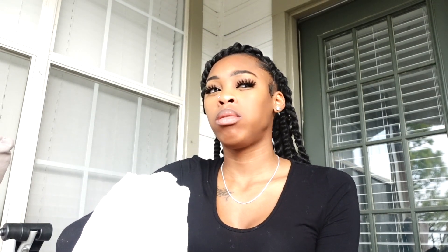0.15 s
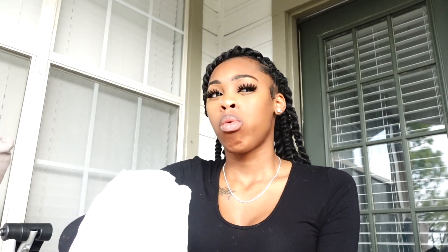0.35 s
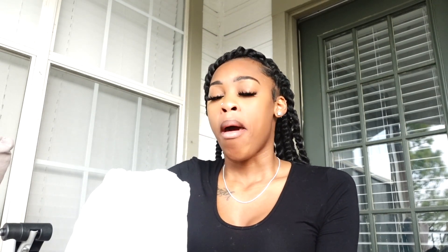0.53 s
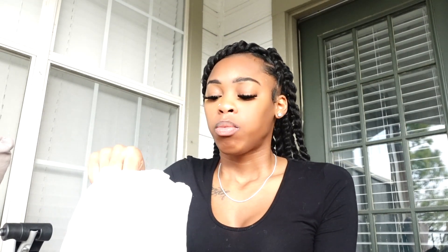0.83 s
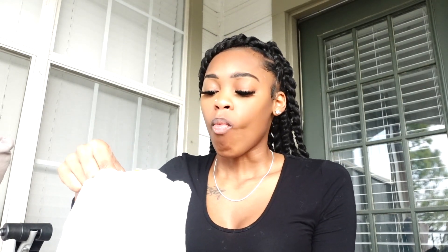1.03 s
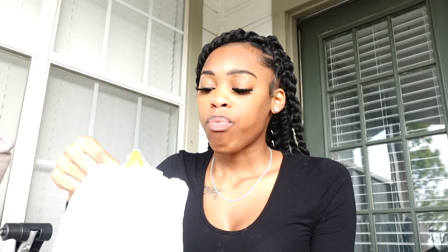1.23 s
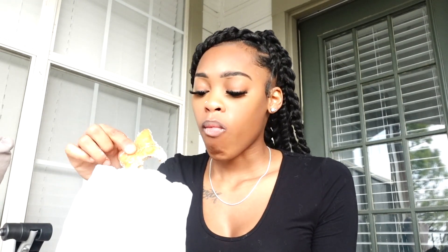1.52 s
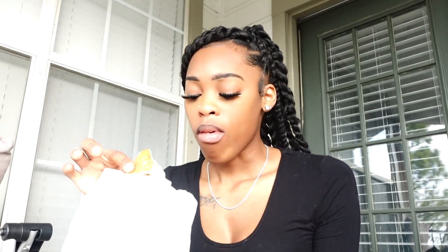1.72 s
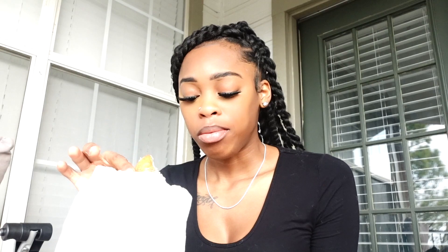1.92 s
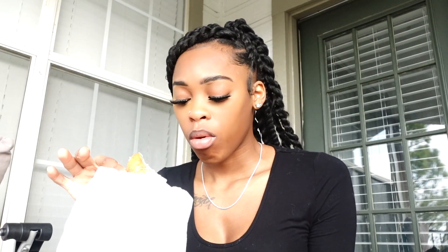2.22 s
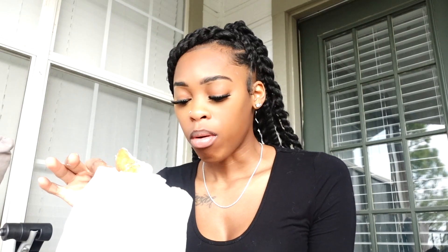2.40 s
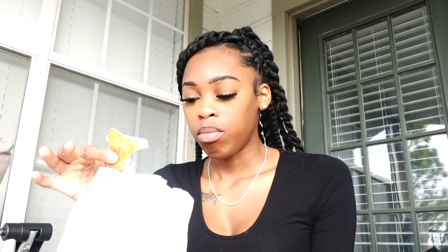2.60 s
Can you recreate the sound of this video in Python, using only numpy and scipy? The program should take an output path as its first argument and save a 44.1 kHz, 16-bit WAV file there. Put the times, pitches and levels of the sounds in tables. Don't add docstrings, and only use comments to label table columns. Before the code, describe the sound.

A stiff paper bag crinkles close to a phone microphone: a busy burst of snaps, ticks and brief finger squeaks, then sparser crackles and a few loud pops, on a covered porch with faint distant town hush.

```python
import sys
import numpy as np
from scipy import signal
from scipy.fft import rfft, irfft
from scipy.io import wavfile
from scipy.ndimage import uniform_filter1d

SR = 44100
rng = np.random.default_rng(int(sys.argv[2]) if len(sys.argv) > 2 else 0)


def undo_db(level):
    steps = np.asarray(level, float) / 20
    return 10 ** steps


def file_out(sig):
    cols = np.atleast_2d(sig).T
    lim = np.clip(cols, -1, 1)
    pcm = np.round(lim * 32767).astype(np.int16)
    wavfile.write(sys.argv[1], SR, pcm)


N = 121275

# start_s, body_peak_db, panel_ring_hz, snap_level_db, crack_level_db (both relative to body)
CREASE_SNAPS = [(.071, -33, 1270, -3, -33), (.199, -26.5, 1086, 0, -2.5), (.216, -34.5, 1240, -2, -2),
                (0.4127, -27, 1490, 1, -1.5), (0.432, -45, 1240, 7, 0), (0.49, -31.5, 1150, -1, -17),
                (0.519, -33, 1410, -8, 1), (.549, -26.5, 1390, -19, -8), (0.7257, -29, 1098, 3.5, 5),
                (0.9754, -32.5, 1120, -9.5, -18), (.9915, -29.5, 944, -28, -33),
                (1.348, -34, 860, -2.5, -9), (1.678, -41, 1040, 5, -30), (1.6907, -32, 1070, -20, -33),
                (1.6955, -19.5, 1064, 0, -0.5), (1.719, -34, 1540, -3, -6), (1.866, -31.5, 1165, -5, -24),
                (1.957, -33, 1330, -10, -32), (1.995, -31, 1270, 0, -1.5), (2.253, -23.5, 1087, -6.5, -11),
                (2.276, -24, 833, -12, 1), (2.308, -32, 1330, -19, -26), (2.371, -17, 1280, -11, 5.5),
                (2.509, -39.5, 1370, -27, -32), (2.278, -23, 1660, -16, -23), (0.546, -41, 1480, 4.5, -5),
                (.552, -31, 1250, -5, -12), (0.491, -40, 1340, -10, -20), (2.373, -25, 2170, 9, -6),
                (.204, -48, 1140, -4, -8)]
# start_s,
# peak_db, centre_hz
FOLD_TICKS = [(1.707, -26, 4500), (0.263, -46, 9000), (.3795, -37, 10500), (0.388, -37, 10000),
              (0.455, -28, 10300), (0.532, -25, 3100), (.588, -42, 14000), (1.249, -43.5, 8100),
              (1.261, -38, 4280), (1.351, -29.5, 4570), (1.788, -40, 11000), (1.793, -43, 9700),
              (1.810, -46, 12000), (1.822, -48, 12000), (1.829, -38, 7500), (1.845, -46, 5100),
              (1.848, -45, 11000), (1.857, -38, 10200), (1.872, -31.5, 5230), (1.887, -37, 5100),
              (1.894, -34.5, 9450), (1.906, -42, 7000), (1.944, -39, 12200), (2.245, -42, 8100),
              (2.2629, -26, 7100), (2.360, -44, 3800), (2.3702, -15.5, 8150), (2.464, -40, 11100),
              (2.277, -47, 4400), (2.729, -44, 1500), (.3765, -46, 10500), (.3855, -40, 11500),
              (0.397, -44, 9800), (0.408, -40, 2800), (.433, -28, 4500), (0.444, -30, 3460),
              (.5195, -19, 3060), (.530, -36, 3020), (.588, -35, 3020), (.644, -33, 2570),
              (0.712, -44, 9200), (.726, -21.5, 6660), (1.787, -39, 4170), (1.793, -43, 4300),
              (1.810, -46, 5500), (1.822, -51, 6500), (1.831, -37.5, 4000), (1.832, -45, 10000),
              (1.848, -39, 5500), (1.853, -46, 11000), (1.8575, -37, 6270), (1.876, -38, 11000),
              (1.883, -44, 9000), (1.917, -48, 4600), (2.007, -35, 3200), (2.008, -34, 2630),
              (2.263, -29.5, 5000), (2.364, -44, 10000), (2.48, -43, 3700), (2.286, -42, 4500)]
# start_s, length_s, level_db, pitch_hz, pitch_rise_share_per_s
FINGER_SQUEAKS = [(0.029, 0.025, -40, 4506, 0), (0.3065, 0.018, -34, 2505, 3), (0.347, 0.01, -43, 2490, 6),
                  (0.385, 0.0049, -29, 2440, 20), (0.394, 0.001, -24, 3140, 3),
                  (0.399, 0.001, -26, 3250, 5), (0.4538, 0.00087, -19, 3220, 0),
                  (0.615, 0.021, -41.5, 4640, -2), (0.383, 0.0075, -41, 1970, 15),
                  (.326, .005, -47, 2500, 0), (0.333, 0.015, -45, 4550, 0.5)]
# start_s, level_db, brightness_db_per_octave
HAND_SLIDE = [(0, -52.5, 2.5), (.125, -50, 0), (0.147, -57.5, 0.5), (0.199, -44, 0), (.27, -61.5, -1),
              (0.401, -49, 2), (0.638, -49, 0.5), (.7, -56, 0.5), (.97, -71.5, 1), (1.11, -56.5, 0.5),
              (1.18, -78.5, 7.5), (1.27, -57, 0), (1.4, -90, 8), (1.76, -71, -9), (1.87, -61, 1.5),
              (2.15, -75.5, -0.5), (2.55, -62, -6), (2.75, -72, 3)]
# frequency_hz, level_db
PAPER_COLOUR = [(180, -59), (300, -27), (337, -11.5), (713, -3), (1030, -2), (1640, -2), (4590, -5.5),
                (16000, -25.5)]
# frequency_hz, level_db
TOWN_COLOUR = [(15, -69), (25, -42), (335, -14), (416, -16.5), (591, -4.5), (1000, 0), (1790, -4),
               (3000, -12), (6000, -24), (16000, -31.5)]

RING_T60_S, CRACK_T60_S = 0.016, 0.018
BODY_DB, SNAP_DB, CRACK_DB, TREBLE_DB = -4, 2, 1, -8
SNAP_HZ, CRACK_HZ, TREBLE_HZ = 2306, 4400, 9000
FIRST_CRACK = 14
TICK_T60_S = 0.007
GRAINS_PER_S, GRAIN_SPREAD_DB, FLUTTER_DB = 1400, 3.5, 3
BAG_LOW_HZ = 369
PORCH_T60_S, PORCH_TREBLE_T60_S, PORCH_DB, PORCH_SIDE_DB = 0.18, 0.25, -7, -7.5
WALL_S, WALL_DB = 0.0104, -17.5
SQUEAK_ECHO_DB, TICK_ECHO_DB = -3, 1
HUSH_DB, HUSH_SIDE_DB, HUSH_WIDE_HZ = -53, -7.5, 2500
LEFT_DB, SNAP_SIDE_DB = 0.2, -20
TOP_HZ, EDGE_HZ = 15800, 16450
LEFT_RIGHT = np.array([[1], [-1]])


def colour(x, table, tilt_db=0.):
    f, points = np.fft.rfftfreq(x.shape[-1], 1 / SR) + 1, np.array(table)
    db = np.interp(np.log(f), np.log(points[:, 0]), points[:, 1])
    db = db + tilt_db * np.log2(f / 3000)
    return irfft(rfft(x) * undo_db(db), x.shape[-1])


def unit(x):
    return x / np.sqrt(np.mean(x ** 2))


def peak(x):
    return x / np.abs(x).max(axis=1, keepdims=True)


def fade(t, t60):
    return np.exp(-np.log(1000) * t / t60)


def band(x, hz, width):
    f = np.fft.rfftfreq(x.shape[-1], 1 / SR) + 1
    bell = np.exp(-.5 * (np.log2(f / hz) / width) ** 2)
    return irfft(rfft(x) * bell, x.shape[-1])


def walk(rate):
    k = int(SR / rate)
    smooth = uniform_filter1d(rng.standard_normal(N), k)
    return unit(uniform_filter1d(smooth, k))


def place(rows, sounds):
    sounds = peak(sounds) * undo_db(rows[:, 1:2])
    power = uniform_filter1d(np.abs(rfft(sounds)) ** 2, size=sounds.shape[1] // 40, axis=1)
    averaged = np.roll(irfft(np.sqrt(power)), 64, axis=1)[:, :256]
    out = np.zeros((2, N + sounds.shape[1]))
    for start_s, direct, to_walls in zip(rows[:, 0], sounds, averaged):
        i = int(start_s * SR)
        out[0, i:i + len(direct)] += direct
        out[1, i:i + len(to_walls)] += to_walls
    return out[:, :N]


def snaps():
    e, t = np.array(CREASE_SNAPS), np.arange(2048) / SR
    start_s, body_db, ring_hz = e[:, 0], e[:, 1], e[:, 2:3]
    noise = rng.laplace(size=(len(e), 2048)) * 1.5
    noise[:, 30] = FIRST_CRACK
    chance = rng.random((len(e), 2, 4))

    spacing = np.c_[np.ones(len(e)), 2 ** (chance[:, 0, 1:] - .2)]
    mode_hz = (ring_hz * spacing)[..., None]
    share = np.array([1, .5, .5, .5])[:, None]
    modes = share * np.sin(2 * np.pi * (mode_hz * t + chance[:, 1, :, None]))
    modes = modes * fade(t, RING_T60_S * 1000 / mode_hz)
    ring = modes.sum(axis=1) * (1 - fade(t, 0.0021))

    def burst(hz, width):
        return peak(band(noise, hz, width) * fade(t, CRACK_T60_S) * (1 - fade(t, 0.00097)))

    body = peak(peak(ring) + undo_db(BODY_DB) * burst(ring_hz, 0.43))
    snap = burst(SNAP_HZ, 0.35)
    crack = burst(CRACK_HZ, 0.33) + undo_db(TREBLE_DB) * burst(TREBLE_HZ, 0.39)
    x = body + undo_db(SNAP_DB + e[:, 3:4]) * snap + undo_db(CRACK_DB + e[:, 4:5]) * crack
    peak_db = body_db + 20 * np.log10(np.abs(x).max(axis=1))
    return place(np.c_[start_s, peak_db], x)


def ticks():
    e, t = np.array(FOLD_TICKS), np.arange(1024) / SR
    click = band(rng.standard_normal((len(e), 1024)) ** 3, e[:, 2:3], 0.33)
    return place(e, click * fade(t, TICK_T60_S) * (1 - fade(t, .002)))


def squeaks():
    e, t = np.array(FINGER_SQUEAKS), np.arange(2048) / SR
    length_s, pitch_hz, rise = e[:, 1:2], e[:, 3:4], e[:, 4:5]
    shake = band(rng.standard_normal((len(e), 2048)), 280, 1.0)
    shake = shake / shake.std(axis=1, keepdims=True)
    bend = 1 + rise * (t - length_s / 2) + 0.016 * shake * (pitch_hz / 2500) ** 2.0
    ph = 2 * np.pi * pitch_hz * np.cumsum(bend, axis=1) / SR
    upper = .25 * np.sin(1.5 * ph) + .14 * np.sin(2.4 * ph) + .08 * np.sin(3 * ph)
    tone = np.sin(ph) + .12 * np.sin(ph / 2) + (length_s > .004) * upper
    shape = (1 - fade(t, 0.0012)) * fade(np.maximum(t - length_s, 0), 0.0087)
    shape = shape * undo_db(1.7 * shake[:, ::-1])
    return place(e[:, [0, 2]], tone * shape)


def slide():
    c, t = np.array(HAND_SLIDE), np.arange(N) / SR
    chance = rng.random((2, N))
    height = undo_db(-GRAIN_SPREAD_DB * np.log(chance[1] + .03))
    grains = (chance[0] < GRAINS_PER_S / SR) * height * np.sign(rng.standard_normal(N))
    rub = unit(colour(grains + 0.27 * rng.standard_normal(N), PAPER_COLOUR))
    tilt = np.clip(np.interp(t, c[:, 0], c[:, 2]), -4, 4)
    out = np.zeros(N)
    for hz in 500 * 2 ** np.arange(6):
        out += band(rub, hz, 0.72) * undo_db(tilt * np.log2(hz / 3000) + FLUTTER_DB * walk(14))
    return out * undo_db(np.interp(t, c[:, 0], c[:, 1]))


def porch(x):
    t = np.arange(int(.35 * SR)) / SR
    n = rng.standard_normal((2, len(t)))
    low = signal.lfilter([.4], [1, -.6], n)
    tail = low * fade(t, PORCH_T60_S) + (n - low) * fade(t, PORCH_TREBLE_T60_S)
    tail = tail * np.clip(t / WALL_S, 0, 1) ** 1.16
    tail = colour(tail, [(500, -10), (750, -1), (4000, 0), (8000, 0), (14000, 1)])
    tail = undo_db(PORCH_DB) * tail / np.sqrt((tail[0] ** 2).sum())
    slap = n[1] * np.exp(-.5 * ((t - WALL_S) / 0.0017) ** 2) / 10
    tail[0] += undo_db(WALL_DB) * slap
    side = colour(tail[1], [(1000, -1.5), (3000, -13.5), (8000, -12)])
    response = tail[0] + undo_db(PORCH_SIDE_DB) * side * LEFT_RIGHT
    return signal.fftconvolve(x[None], response, axes=1)[:, :N]


def hush():
    mid, side = colour(rng.standard_normal((2, N)), TOWN_COLOUR)
    side = colour(side, [(130, -4), (300, 1), (HUSH_WIDE_HZ, -2), (16000, -10)])
    x = mid + undo_db(HUSH_SIDE_DB) * side * LEFT_RIGHT
    return unit(x) * undo_db(HUSH_DB + 0.13 * walk(22.0))


def scene():
    thin = signal.butter(4, BAG_LOW_HZ, "high", fs=SR, output="sos")
    bag = [*snaps(), *ticks(), squeaks()[0], slide()]
    snap, snap_far, tick, tick_far, squeak, rub = signal.sosfilt(thin, bag)
    sharp, wide = snap + tick, snap + .5 * tick
    slope = np.roll(wide, -1) - np.roll(wide, 1)
    side = undo_db(SNAP_SIDE_DB) * slope * LEFT_RIGHT

    soft_echo = porch(rub + undo_db(SQUEAK_ECHO_DB) * squeak).mean(axis=0)
    bed = squeak + rub + soft_echo + hush()
    bed = signal.sosfilt(signal.ellip(8, .2, 60, TOP_HZ, fs=SR, output="sos"), bed)
    near = (sharp + bed) * undo_db(LEFT_DB * LEFT_RIGHT)
    return near + side + porch(snap_far) + undo_db(TICK_ECHO_DB) * porch(tick_far)


def band_limit(x):
    return signal.sosfilt(signal.butter(12, 16500, fs=SR, output="sos"), x)


def record(dry):
    top_cut = signal.ellip(10, .2, 70, EDGE_HZ, fs=SR, output="sos")
    mix = signal.sosfilt(top_cut, dry)
    return band_limit(mix)


dry = scene()
out = record(dry)
file_out(out)
```